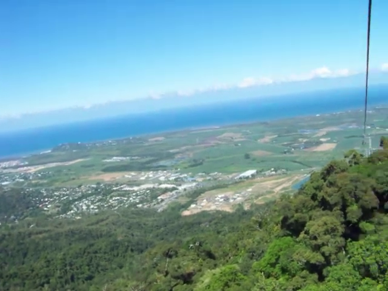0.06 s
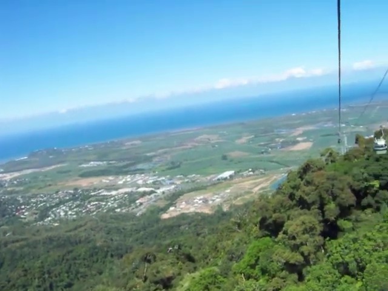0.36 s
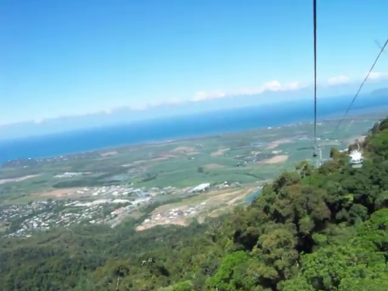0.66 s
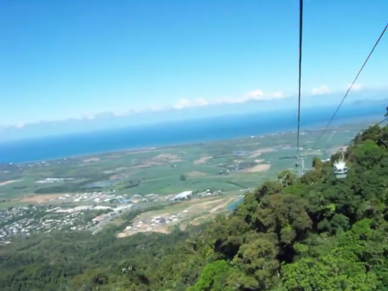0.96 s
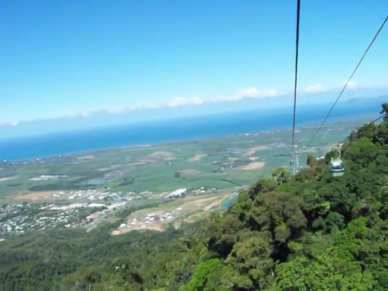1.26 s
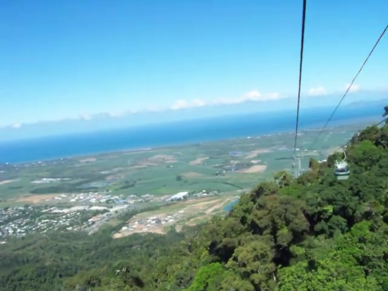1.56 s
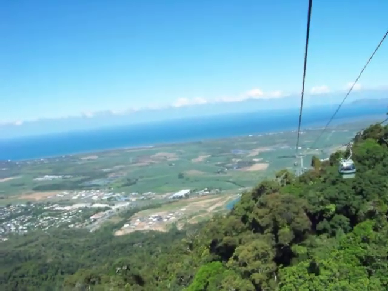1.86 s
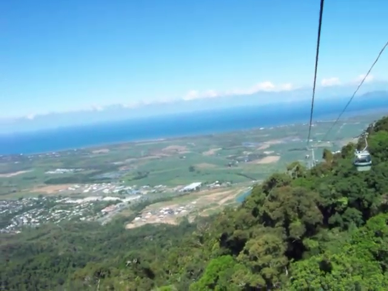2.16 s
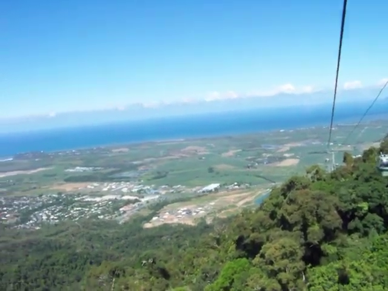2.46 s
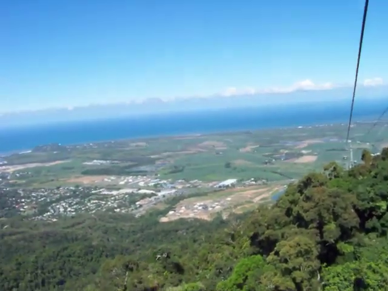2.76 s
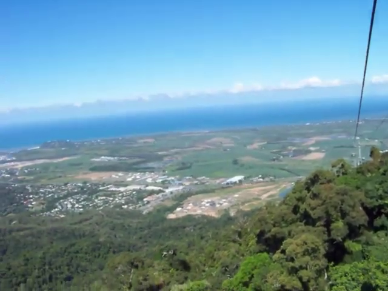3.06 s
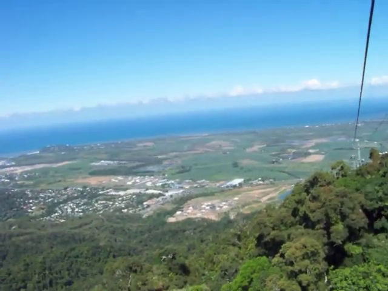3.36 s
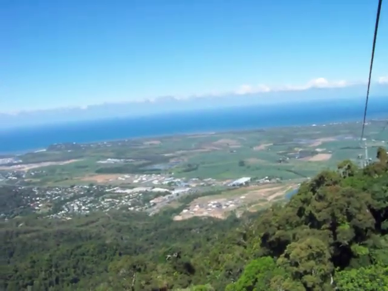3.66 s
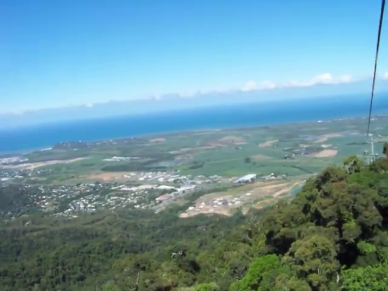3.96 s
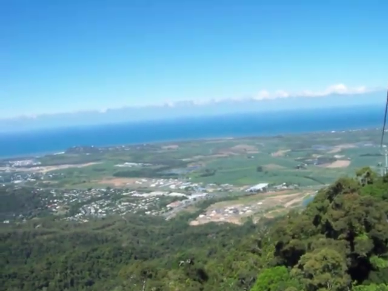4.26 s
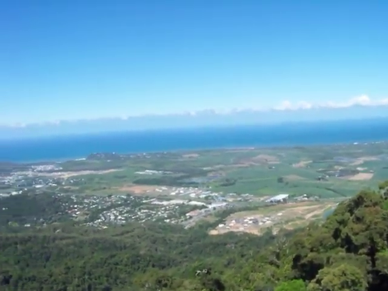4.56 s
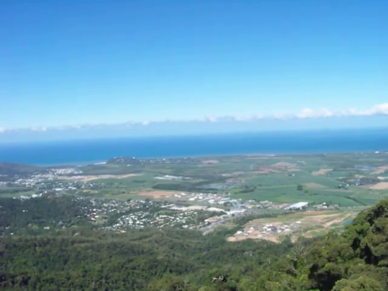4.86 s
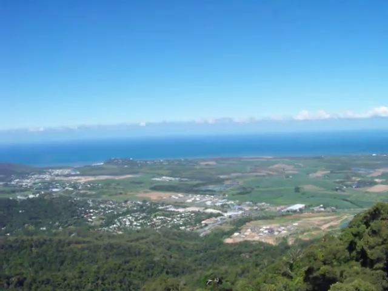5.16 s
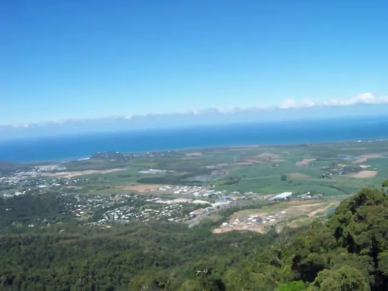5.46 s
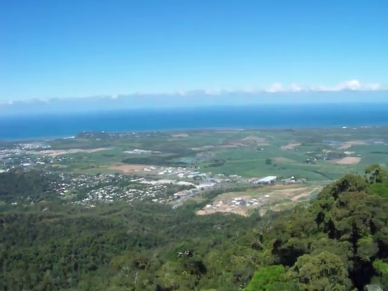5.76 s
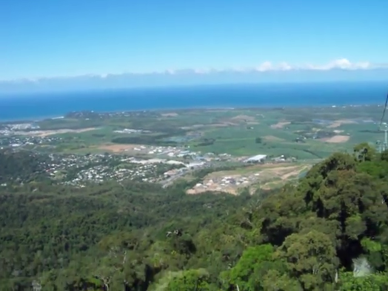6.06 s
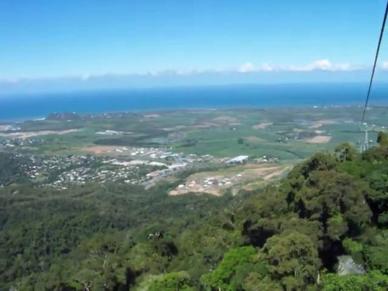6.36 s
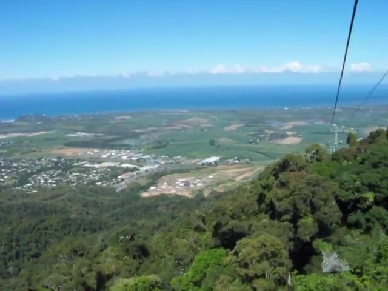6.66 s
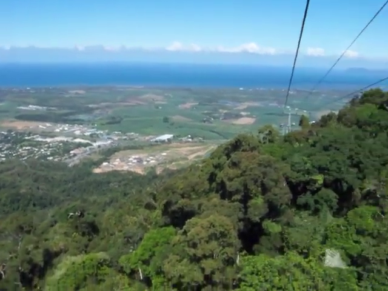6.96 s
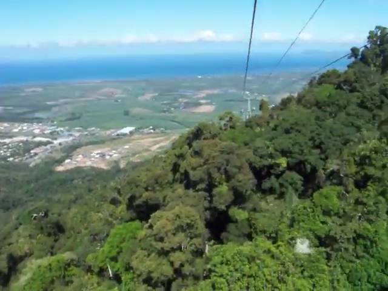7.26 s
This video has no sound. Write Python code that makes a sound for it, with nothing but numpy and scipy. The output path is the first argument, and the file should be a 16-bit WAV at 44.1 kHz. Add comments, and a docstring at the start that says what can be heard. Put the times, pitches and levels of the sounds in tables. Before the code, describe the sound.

A gondola cabin rumbles and drones along its cable, with scattered panel knocks, clicks, creaks and some cloth rustling.

```python
"""Inside a gondola cabin gliding down its cable. The rope shakes the hanger, so the cabin rumbles
and the air in it drones at its lowest note, while gusts push on the shell. As the load shifts,
panels and seats knock, creak, tick and thud. Cloth rustles, shoes scuff, a latch clacks and one
joint squeaks. A hand-held camera adds its own hiss and cuts two narrow bands and the top treble."""
import sys
import numpy as np
from scipy import signal
from scipy.fft import rfft, irfft
from scipy.io import wavfile
from scipy.ndimage import uniform_filter1d

SR = 44100
rng = np.random.default_rng(int(sys.argv[2]) if len(sys.argv) > 2 else 0)


def transcribe(u):
    """Save the signal u as a 16-bit wav file named by the first command-line argument.

    u: samples, shape (n,) or (channels, n), limited to [-1, 1]; the rate is SR.
    q: integer samples, one column per channel.
    """
    v = np.clip(np.atleast_2d(u).T, -1, 1)
    q = np.round(v * 32767).astype(np.int16)
    wavfile.write(sys.argv[1], SR, q)


N = 322812
T = np.arange(N) / SR
HIT_T = T[:SR // 2]  # half a second for one hit to die away

# how alike the cabin sounds on the left and right: pitch_hz, correlation
STEREO_LIKENESS = [(250, 0.93), (500, 0.82), (1000, 0.62), (2000, 0.047)]
# gusts pushing on the shell: start_s, length_s, level_db
WIND_GUSTS = [(.3, 0.39, -22.5), (.75, 0.31, -25.5), (2.15, 0.37, -25), (6.15, 1, -31.5)]
# tone of the wind: pitch_hz, level_db
WIND_TONE = [(15, -11), (50, -12.5), (100, -15.5), (200, -76.5)]
# shaking that comes down from the rope: time_s, rumble_db, rolling_db
ROPE_LEVELS = [(0.0, -28.5, -38.5), (5.55, -25.5, -38), (6.52, -25, -30.5), (7.32, -27, -36.5)]
# tone of the deep rumble: pitch_hz, level_db
RUMBLE_TONE = [(12, -15), (22, -3.5), (80, -5.5), (110, -9), (135, 3.5), (165, -9.5), (190, 1.5),
               (215, -4.5), (250, -0.5), (350, -23.5), (700, -48.5)]
# tone of the rolling noise, also of a thud's echo: pitch_hz, level_db
ROLLING_TONE = [(200, -12), (390, 2.5), (595, -1.5), (660, 7.5), (730, -3.5), (830, -2), (1150, -19),
                (1400, -12.5), (2200, -20), (8000, -43)]
# the drifting note of the cabin air: time_s, pitch_hz
DRONE_PITCH = [(1.7, 95), (2.6, 90.8), (4.2, 96.03), (7.3, 98.64)]
# moments when the drone grows louder: start_s, length_s, level_db
DRONE_SWELLS = [(1.34, 0.26, -27.5), (1.72, 0.12, -24.5), (1.98, 0.14, -23), (2.48, 0.18, -25.5),
                (3.01, 0.19, -25.5), (3.36, 0.2, -26), (3.61, 0.24, -26.5), (4.19, 0.58, -20),
                (4.82, 0.38, -26.5), (5.42, 0.33, -22.5), (5.82, 0.26, -22.5), (6.2, 0.34, -27.5)]
# tone of the chattering floor: pitch_hz, level_db
CHATTER_TONE = [(120, -20), (220, 3), (500, -1), (1000, -12), (3000, -38)]
# tone of the camera's hiss: pitch_hz, left_db, right_db
HISS_TONE = [(2300, -23, -22), (2920, -10, -21), (3520, -13, -14), (3940, -4.5, -5), (4970, -7, -3),
             (5330, -8, -2), (5780, -25, -15.5), (6480, -25, -15), (6840, -14, -8.5)]
# slow drift in the loudness of the hiss: time_s, change_db
HISS_DRIFT = [(0, -1.2), (3.3, 0.72), (7.3, -2.05)]
# hard knocks on the panels, each favouring one pitch: start_s, level_db, focus_hz
PANEL_KNOCKS = [(0.026, -13, 720), (0.074, -19.5, 640), (0.326, -27, 915), (0.445, -17, 890),
                (0.567, -20, 1030), (0.699, -18.5, 900), (0.891, -16, 596), (1.132, -21.5, 659),
                (1.211, -21.5, 785), (1.316, -35, 800), (1.769, -25, 720), (2.038, -20, 890),
                (2.587, -31, 594), (3.426, -12.5, 751), (3.499, -18, 700), (3.773, -17, 1100),
                (4.039, -15.5, 635), (4.324, -26, 1190), (5.105, -25.5, 700), (5.33, -23, 700),
                (5.24, -27, 654), (6.364, -10.5, 1110), (6.39, -21.5, 1150), (6.434, -14, 1220),
                (6.472, -14, 1210), (6.6, -16, 856), (6.808, -21, 700)]
# notes a wall panel rings at: pitch_hz, level_db
PANEL_NOTES = [(395, -8), (560, 3.5), (680, -3.5), (860, 0.5), (1120, -0.5), (1230, 0.5), (1560, -8)]
# tones of a knock's echo and of its bright crack: pitch_hz, level_db
KNOCK_ECHO_TONE = [(130, -15), (400, 3.5), (1150, -3), (1600, -9), (7000, -35)]
CRACK_TONE = [(1500, -5.5), (3100, -6.5), (8000, -18.5)]
# shifts of load that make seats and trim rub: start_s, length_s, final_db
LOAD_SHIFTS = [(0.418, 0.52, -36), (3.212, 0.26, -36), (5.873, 0.53, -38), (6.355, 0.13, -29),
               (6.73, 0.52, -33.5)]
# tone of surfaces rubbing together: pitch_hz, level_db
RUB_TONE = [(200, -7), (500, -2), (1100, 5), (1600, -6), (3000, -8), (5500, -15), (8000, -26)]
# plastic trim slipping: start_s, level_db, tail_db
TRIM_TICKS = [(0.636, -8.5, -6), (0.6705, -6.5, -5), (0.7376, -17, -9), (0.7685, -12, 1), (0.8046, -17, 0),
              (0.842, -10, 0), (0.88, -9.5, -2), (0.9216, -10, -15), (0.9841, -7, -3), (3.453, -12.5, 2),
              (3.7295, -13, 2), (6.1768, -11.5, 7), (6.248, -10.5, 12)]
# tone of a tick: pitch_hz, level_db
TICK_TONE = [(300, 0.5), (850, 2.5), (1400, -5), (2300, -6.5), (3100, -0.5), (5700, -4.5), (8500, -19)]
# cloth sliding over a seat: start_s, length_s, level_db
CLOTH_SLIDES = [(1.38, 0.68, -40.5), (3.14, 0.78, -36.5), (5.98, 0.39, -39)]
# tone of the sliding cloth: pitch_hz, level_db
CLOTH_TONE = [(1700, -13.5), (2800, 1), (5000, -5.5)]
# soles dragging on the floor: start_s, length_s, level_db
SHOE_SCUFFS = [(2.026, 0.042, -28.5), (4.402, 0.034, -25)]
# pings of a small hard part: start_s, level_db
PART_PINGS = [(2.14, -23), (5.9615, -12), (6.749, -18)]
# notes the door latch rings at: pitch_hz, level_db
LATCH_NOTES = [(533, -4), (626, 1), (707, 4), (1061, 0.5), (1227, -4), (1464, -6), (2260, -12), (2860, -6),
               (2910, -5)]
# tone of the latch's echo: pitch_hz, level_db
LATCH_ECHO_TONE = [(300, -8), (700, -2), (3100, -12.5), (3500, -16), (8000, -27)]
# soft blows on floor and seat: start_s, level_db, dullness_db_per_octave
SOFT_BLOWS = [(3.064, -19, 6), (3.367, -11.5, 12), (3.394, -15, 12), (3.424, -9, 2), (4.039, -5.5, 6),
              (6.365, -14, 5)]
# notes the floor booms at: pitch_hz, level_db
FLOOR_NOTES = [(66, -12.5), (130, -19), (187, 1.5), (238, 3), (420, 1), (620, -0.5), (820, 1.5)]
# the floor shuddering: start_s, length_s, level_db
FLOOR_SHUDDER = [(4.39, .2, -28)]
# a dry joint catching: start_s, length_s, level_db
JOINT_CATCHES = [(5.186, 0.042, -41), (5.226, 0.065, -44)]
# notes in the joint's squeak: pitch_hz, level_db
SQUEAK_NOTES = [(1130, 4), (1420, 3.5), (3350, -4)]
# bursts of crumpling cloth: start_s, length_s, level_db
CLOTH_CRUMPLES = [(6.425, .07, -35), (6.595, 0.047, -33), (6.844, 0.017, -24.5), (6.925, 0.059, -28),
                  (7.055, 0.026, -27), (7.178, 0.02, -28), (7.203, 0.033, -27.5), (7.25, 0.18, -31.5)]


def undb(db):
    """Turn decibels into a number to multiply by."""
    return 10 ** (np.asarray(db) / 20)


def unit(x):
    """Scale a sound so its average power is 1."""
    return x / np.sqrt(np.mean(x ** 2))


def peak(x):
    """Scale a sound so its biggest sample has size 1."""
    return x / np.abs(x).max()


def pan(db):
    """Left and right gains; a positive number makes the left louder."""
    return undb(np.array([[db], [-db]]) / 2)


def curve(rows, column=1):
    """Join the points of a time table with straight lines."""
    rows = np.array(rows)
    return np.interp(T, rows[:, 0], rows[:, column])


def across(rows, size, column=1):
    """Read a pitch table at every frequency of a sound that is `size` samples long."""
    rows = np.array(rows)
    hz = np.fft.rfftfreq(size, 1 / SR)
    return np.interp(np.log(hz + 1), np.log(rows[:, 0]), rows[:, column])


def colour(x, tone, column=1):
    """Turn each frequency up or down as a tone table says."""
    size = x.shape[-1]
    return irfft(rfft(x) * undb(across(tone, size, column)), size)


def cabin_noise(tone, size=N):
    """Stereo noise with a given tone: the two sides are alike in the bass, unrelated in the treble."""
    alike = across(STEREO_LIKENESS, size)
    mid, side = rfft(rng.standard_normal((2, size))) * np.sqrt([1 + alike, 1 - alike])
    pair = irfft(np.array([mid + side, mid - side]), size)
    return unit(colour(pair, tone))


def wander(per_s):
    """A smooth random wobble of about 1 either way, heading for a new value per_s times a second."""
    hold = int(SR / per_s)
    steps = np.repeat(rng.standard_normal(N // hold + 1), hold)
    return unit(uniform_filter1d(uniform_filter1d(steps, hold), hold)[:N])


def rough_note(phase, per_s):
    """A stereo note roughened by random wobbles in its strength and timing."""
    return np.array([wander(per_s) * np.cos(phase) + wander(per_s) * np.sin(phase) for _ in range(2)])


def arches(rows, shape):
    """Loudness that rises and falls in arches; a smaller shape gives a flatter top."""
    return sum(undb(db) * np.abs(np.sin(np.pi * np.clip((T - start_s) / length_s, 0, 1))) ** shape
               for start_s, length_s, db in rows)


def fade(fade_s):
    """A fade that drops 60 dB in fade_s seconds."""
    return np.exp(-np.log(1000) * HIT_T / fade_s)


def echo(tone, fade_s):
    """Reflections off the cabin walls build up in a few milliseconds, then die away."""
    build_up = 1 - np.exp(-HIT_T / 0.002)
    return peak(cabin_noise(tone, len(HIT_T)) * build_up * fade(fade_s))


def ring(notes, fade_s, focus_hz, tilt_db):
    """A struck part rings a little differently each time, and its high notes die sooner."""
    out = 0
    for hz, db in notes:
        strength, detune, lag = rng.standard_normal(3)
        stereo_shift = np.array([[1], [-1]]) * lag * min(hz / 2200, 1)
        phase = 2 * np.pi * hz * (1 + 0.0061 * detune) * HIT_T + stereo_shift
        octaves_away = abs(np.log2(hz / focus_hz))
        gain = rng.choice([-1, 1]) * undb(db + 2.4 * strength - tilt_db * octaves_away)
        out = out + gain * fade(fade_s * np.sqrt(focus_hz / hz)) * np.sin(phase)
    return peak(out)


def add(out, start_s, sound):
    """Mix a sound in at its start time."""
    start = int(start_s * SR)
    out[:, start:start + sound.shape[1]] += sound[:, :N - start]


def wind(breeze_db=-39):
    """Air pushes on the shell: a low, steady breeze with a few gusts."""
    return cabin_noise(WIND_TONE) * np.hypot(undb(breeze_db), arches(WIND_GUSTS, shape=1.3))


def rope_rumble():
    """The rope shakes the shell, making a deep rumble and a higher, fluttering rolling noise."""
    rumble = cabin_noise(RUMBLE_TONE) * undb(curve(ROPE_LEVELS))
    rolling = cabin_noise(ROLLING_TONE) * undb(curve(ROPE_LEVELS, column=2) + wander(17))
    return rumble + rolling


def air_drone(rest_db=-35, waver_db=6, waver_hz=1.63):
    """The cabin air hums at its lowest note; when it swells, the floor chatters once per cycle."""
    phase = 2 * np.pi * np.cumsum(curve(DRONE_PITCH) + waver_hz * wander(12)) / SR
    hum = np.sqrt(2) * (np.sin(phase) + undb(-15) * np.sin(2 * phase))
    chatter = undb(-12) * cabin_noise(CHATTER_TONE) * (1 + np.sin(phase))
    swell = arches(DRONE_SWELLS, shape=0.74)
    rest = undb(rest_db + waver_db * np.tanh(wander(12)))
    return hum * np.hypot(rest, swell) + chatter * swell


def camera_hiss(level_db=-34.5):
    """The camera hisses steadily, with a different tone in each microphone."""
    left = colour(rng.standard_normal(N), HISS_TONE, column=1)
    right = colour(rng.standard_normal(N), HISS_TONE, column=2)
    return unit(np.array([left, right])) * undb(level_db + curve(HISS_DRIFT))


def thin_whine(pitch_hz=4790, level_db=-49, loudest_s=3.1, fall_db_per_s=1.2):
    """A thin, unsteady whine slowly rises out of the hiss and sinks back."""
    phase = 2 * np.pi * np.cumsum(pitch_hz + 22 * wander(2.8)) / SR
    swell = undb(level_db - fall_db_per_s * np.abs(T - loudest_s))
    return unit(rough_note(phase, per_s=90)) * swell * pan(-6.5)


def panel_knocks(rattle_count=10, rattle_db=-29.5, rattle_hz=750):
    """Hard hits ring a panel with a bright crack and an echo; loose parts rattle faintly at random."""
    out = np.zeros((2, N))
    rattles = [((k + rng.random()) * T[-1] / rattle_count, rattle_db + 5 * rng.standard_normal(),
                rattle_hz) for k in range(rattle_count)]
    for start_s, db, focus_hz in PANEL_KNOCKS + rattles:
        walls = 0.65 * echo(KNOCK_ECHO_TONE, fade_s=0.2)
        panel = ring(PANEL_NOTES, fade_s=0.115, focus_hz=focus_hz, tilt_db=9)
        crack_db = -10.5 + 0.51 * db  # in harder hits the crack grows less than the ring
        knock = undb(db) * (panel + walls) + undb(crack_db) * echo(CRACK_TONE, fade_s=0.079)
        add(out, start_s, knock * pan(0.75 + 2 * rng.standard_normal()))
    return out


def strain(rest_db=-45, build_db=3, onset_s=0.011, settle_s=0.015):
    """Loudness of the creaks: it jumps with each shift of load, builds, then settles quickly."""
    gain = undb(rest_db)
    for start_s, length_s, db in LOAD_SHIFTS:
        age_s = T - start_s
        onset = np.clip(age_s / onset_s, 0, 1)
        to_go = np.clip(1 - age_s / length_s, 0, 1)
        settle = np.exp(-np.maximum(age_s - length_s, 0) / settle_s)
        gain = gain + undb(db - build_db * to_go) * onset * settle
    return gain


def seat_creaks(spots=8, slips_per_s=45):
    """Seats and trim rub in tiny, uneven slips; each rubbing spot rings at its own pitch."""
    out = 0
    for hz in np.geomspace(500, 2800, spots):
        size_db = 3.5 * np.minimum(rng.exponential(size=N), 3) + 2 * wander(12)
        slips = (rng.random(N) < slips_per_s / SR) * undb(size_db)
        rub = echo(RUB_TONE, fade_s=0.032)
        one_slip = rub + signal.lfilter(*signal.iirpeak(hz, 5, fs=SR), rub)
        out = out + signal.fftconvolve(slips[None], one_slip, axes=1)[:, :N]
    return unit(out) * strain() * pan(2.1)


def trim_ticks(snap_s=0.012, tail_s=0.14):
    """Plastic trim lets go in single snaps: a sharp spike, then a short tail from the walls."""
    out = np.zeros((2, N))
    for start_s, db, tail_db in TRIM_TICKS:
        tick = cabin_noise(TICK_TONE, len(HIT_T)) * (fade(snap_s) + undb(tail_db) * fade(tail_s))
        add(out, start_s, undb(db) * peak(tick))
    return out * pan(-2.6)


def cloth_slides():
    """Cloth slides over a seat with a soft, uneven hiss."""
    return cabin_noise(CLOTH_TONE) * arches(CLOTH_SLIDES, shape=0.37) * undb(wander(22)) * pan(2)


def shoe_scuffs():
    """A sole drags briefly over the floor, gripping unevenly."""
    return cabin_noise(RUB_TONE) * arches(SHOE_SCUFFS, shape=0.28) * undb(2 * wander(170))


def part_pings(pitch_hz=2900):
    """A small hard part on the left gives a short, bright ping."""
    out = np.zeros((2, N))
    for start_s, db in PART_PINGS:
        click = cabin_noise(TICK_TONE, len(HIT_T)) * fade(0.032)
        ping = signal.lfilter(*signal.iirpeak(pitch_hz, 2, fs=SR), click)
        add(out, start_s, undb(db) * peak(ping))
    return out * pan(5.3)


def door_latch(start_s=3.0605, level_db=-8, rise_s=0.003):
    """Something hard, like the door against its latch, clacks once with a hollow ring."""
    out = np.zeros((2, N))
    walls = undb(-1) * echo(LATCH_ECHO_TONE, fade_s=0.17)
    rise = 1 - np.exp(-HIT_T / rise_s)
    clack = peak(ring(LATCH_NOTES, fade_s=0.185, focus_hz=700, tilt_db=0) * rise)
    add(out, start_s, undb(level_db) * (clack + walls))
    return out


def floor_thuds(flex_s=0.00386, bounce_start_s=3.458, bounce_gap_s=0.02):
    """Each soft blow bends the floor once, booms through it and lingers in the cabin."""
    out = np.zeros((2, N))
    flex = -undb(-3.5) * np.sin(2 * np.pi * np.minimum(HIT_T / flex_s, 1))
    # one run of four even bounces, each weaker and duller than the last
    bounces = [(bounce_start_s + k * bounce_gap_s, -8 - 1.1 * k, 4 + 2.9 * k) for k in range(4)]
    for start_s, db, dull_db in SOFT_BLOWS + bounces:
        walls = undb(-1 - dull_db) * echo(ROLLING_TONE, fade_s=0.21)
        boom = ring(FLOOR_NOTES, fade_s=0.19, focus_hz=200, tilt_db=dull_db)
        add(out, start_s, undb(db) * (flex * min(4 / dull_db, 1) + boom + walls))
    return out * pan(-2.1)


def floor_shudder():
    """At the height of the drone the floor shudders, grinding unevenly."""
    return cabin_noise(CHATTER_TONE) * arches(FLOOR_SHUDDER, shape=0.83) * undb(2 * wander(60))


def joint_squeak(slips_per_s=180):
    """A dry joint sings faintly; catching and slipping makes its notes rough."""
    notes = sum(undb(db) * rough_note(2 * np.pi * hz * T, slips_per_s) for hz, db in SQUEAK_NOTES)
    return notes * arches(JOINT_CATCHES, shape=0.99)


def cloth_rustle(folds=7, snaps_per_s=800):
    """Something light, like a jacket, crumples in bursts of tiny snaps, each fold at its own pitch."""
    out = 0
    for hz in np.geomspace(1500, 3200, folds):
        size_db = 5.5 * np.minimum(rng.exponential(size=N), 3)
        snaps = (rng.random(N) < snaps_per_s / folds / SR) * undb(size_db)
        one_snap = signal.lfilter(*signal.iirpeak(hz, 2, fs=SR), echo(RUB_TONE, fade_s=0.016))
        out = out + signal.fftconvolve(snaps[None], unit(one_snap), axes=1)[:, :N]
    return unit(out) * arches(CLOTH_CRUMPLES, shape=0.47) * pan(2)


def scene():
    """Add up all the sounds; the low noise of the ride sits a little to the right."""
    ride = (wind() + rope_rumble() + air_drone()) * pan(-2.93)
    return (ride + camera_hiss() + thin_whine() + panel_knocks() + seat_creaks() + trim_ticks()
            + cloth_slides() + shoe_scuffs() + part_pings() + door_latch() + floor_thuds()
            + floor_shudder() + joint_squeak() + cloth_rustle())


def record(dry):
    """The camera cuts two narrow bands, softens the treble and removes the very top."""
    soften_hz, top_hz = 7500, 8700
    dry = signal.lfilter(*signal.iirnotch(303, Q=303 / 45, fs=SR), dry)  # 45 Hz wide
    dry = signal.lfilter(*signal.iirnotch(965, Q=965 / 28, fs=SR), dry)  # 28 Hz wide
    dry = signal.sosfilt(signal.butter(14, soften_hz, fs=SR, output="sos"), dry)
    return signal.sosfilt(signal.ellip(10, 0.2, 90, top_hz, fs=SR, output="sos"), dry)


dry = scene()
out = record(dry)
transcribe(out)
```